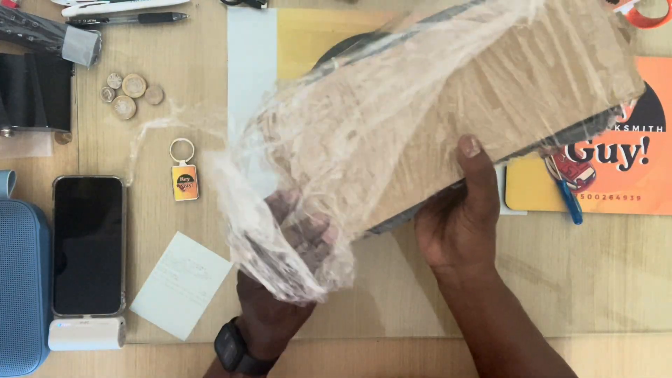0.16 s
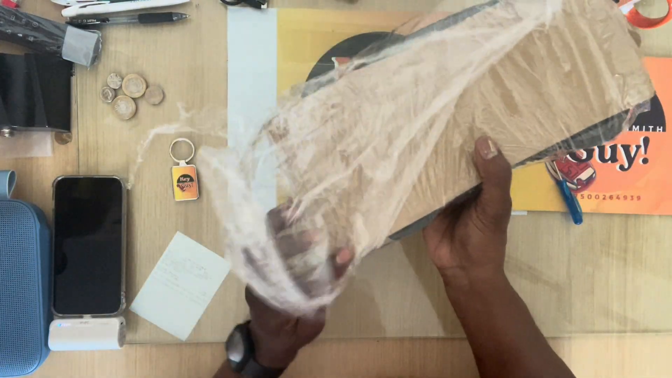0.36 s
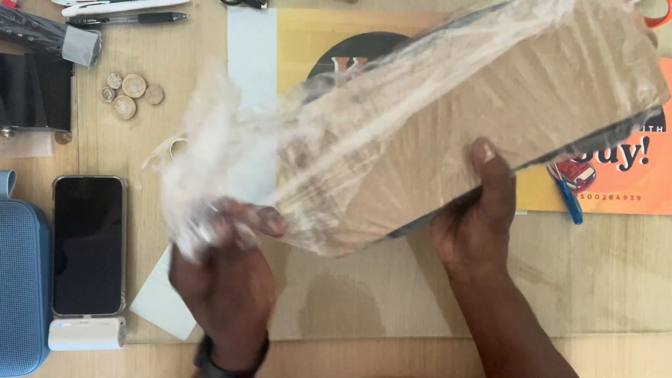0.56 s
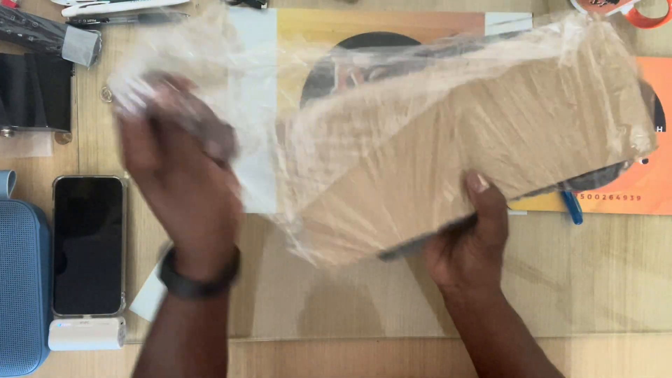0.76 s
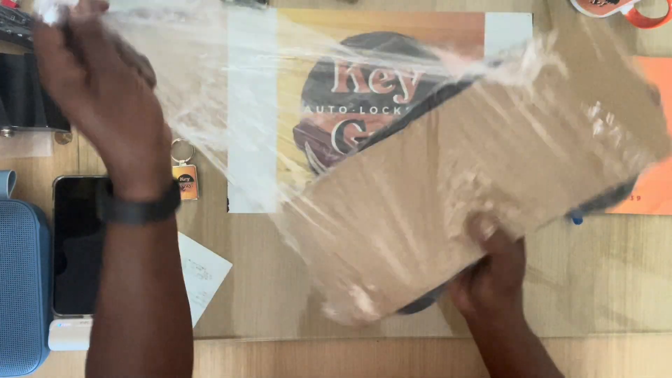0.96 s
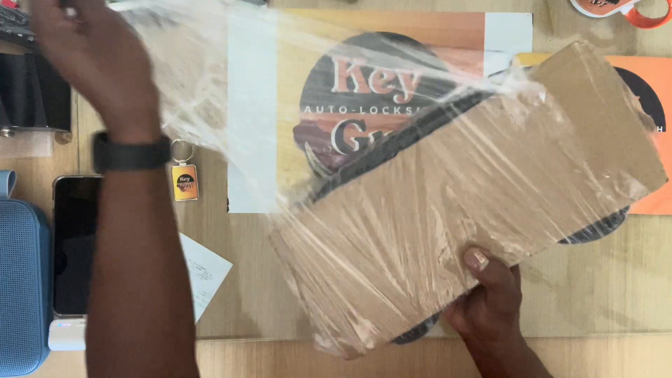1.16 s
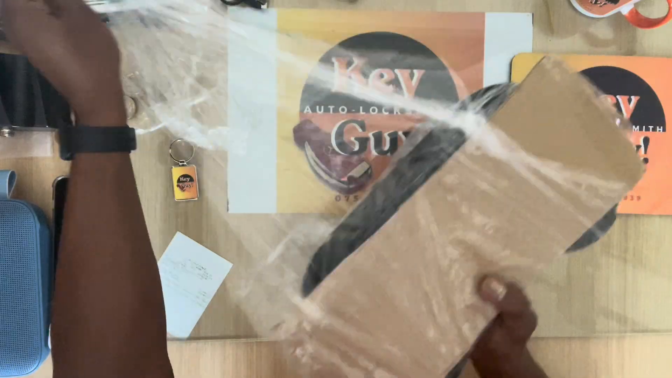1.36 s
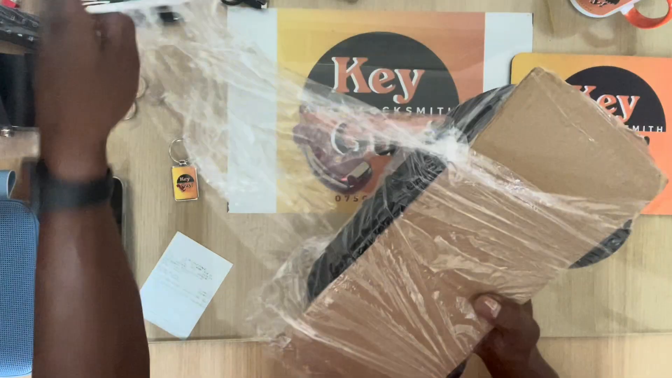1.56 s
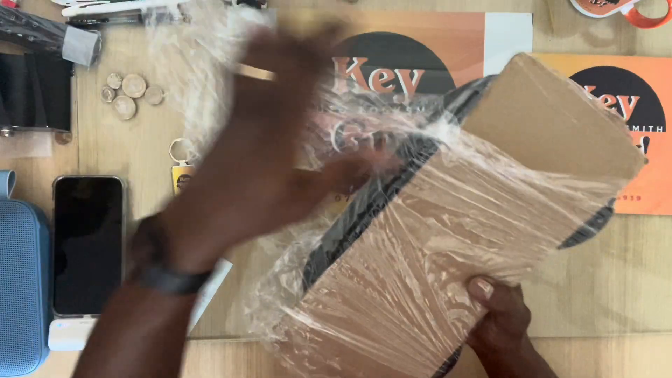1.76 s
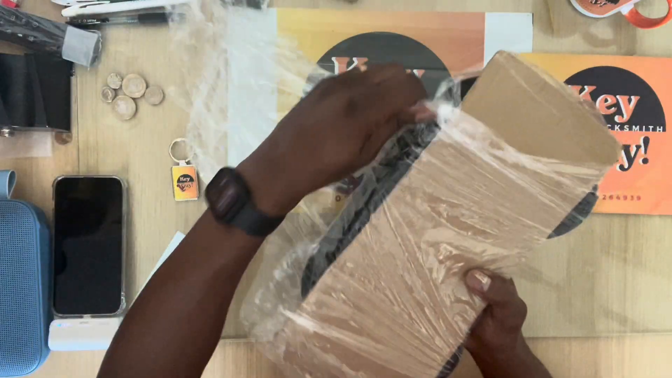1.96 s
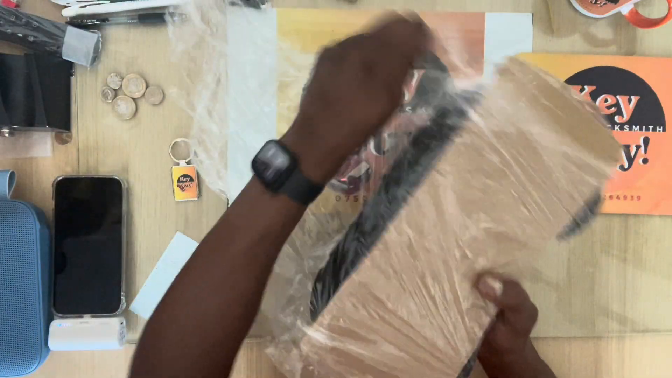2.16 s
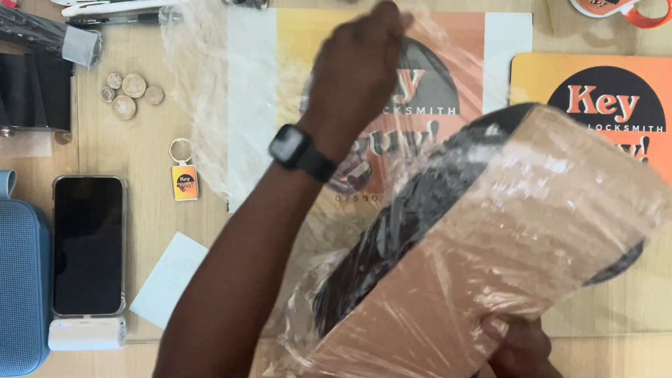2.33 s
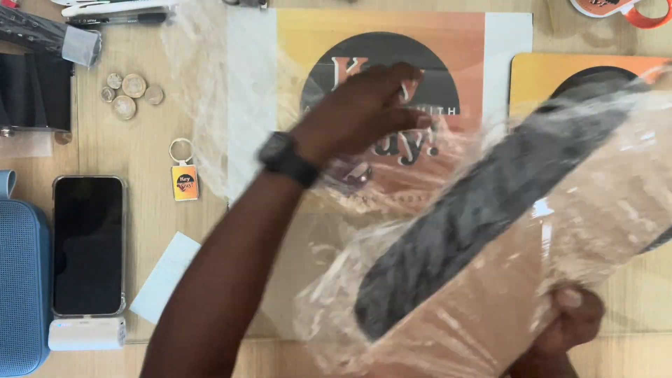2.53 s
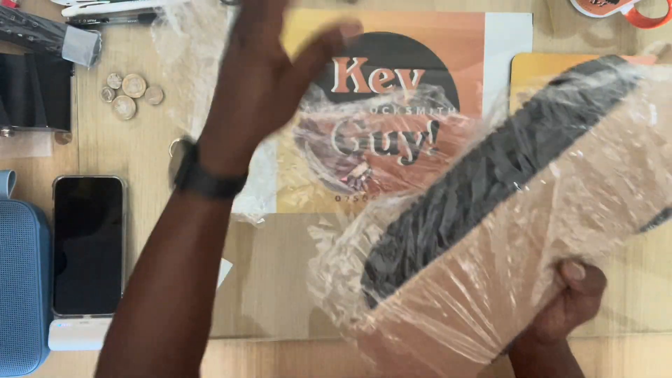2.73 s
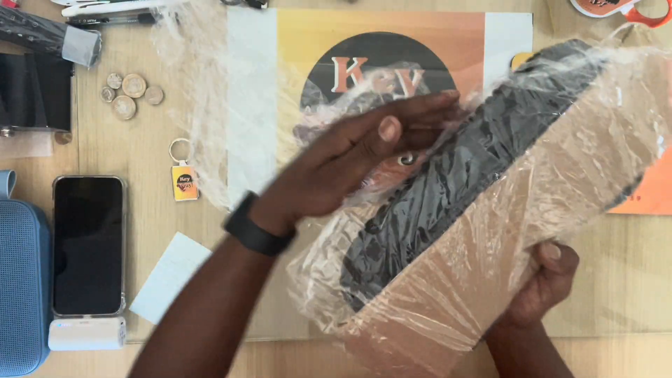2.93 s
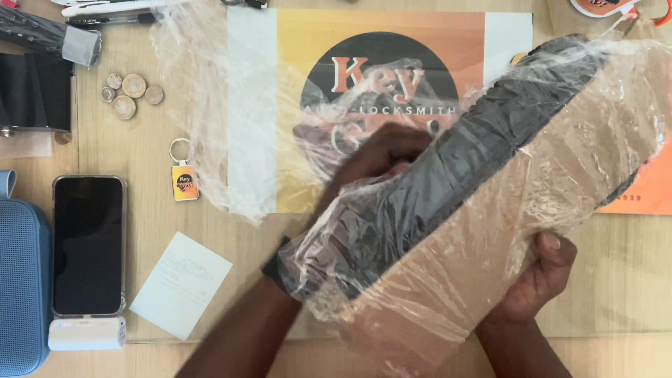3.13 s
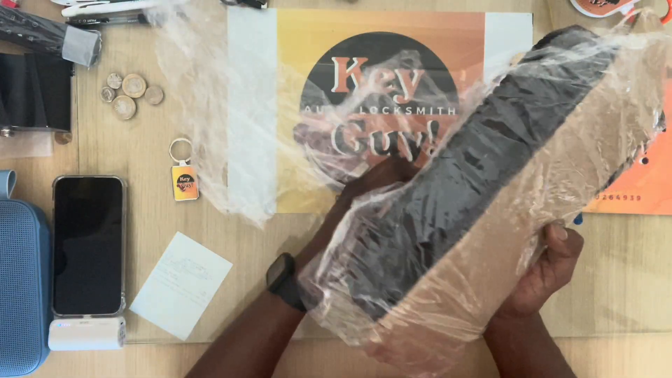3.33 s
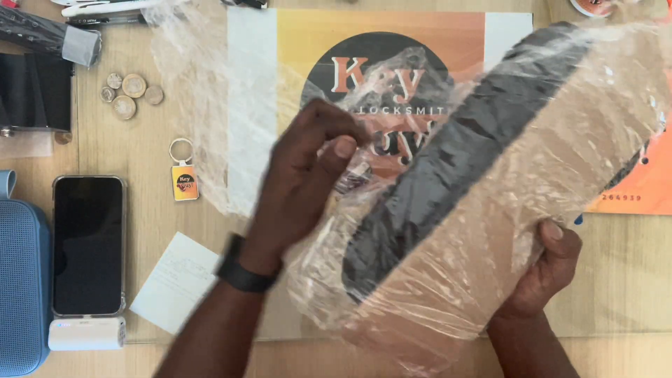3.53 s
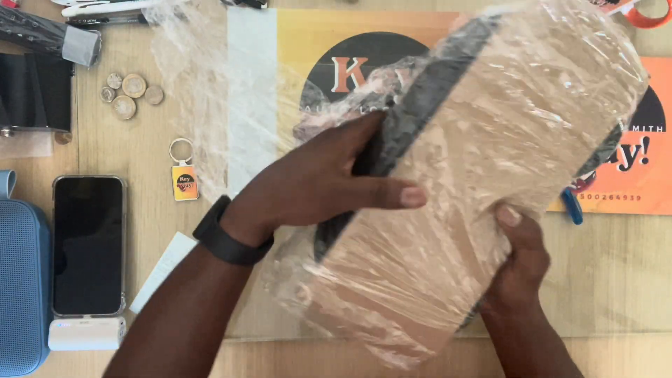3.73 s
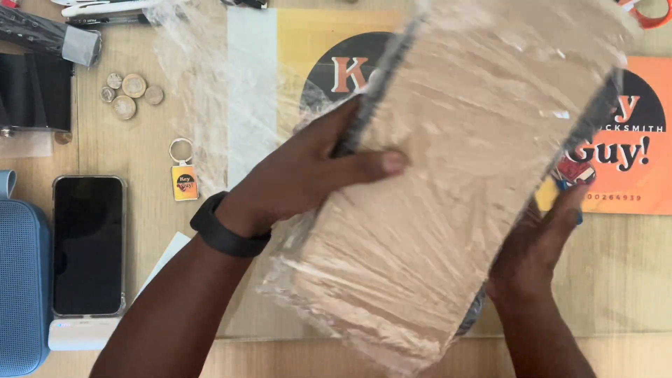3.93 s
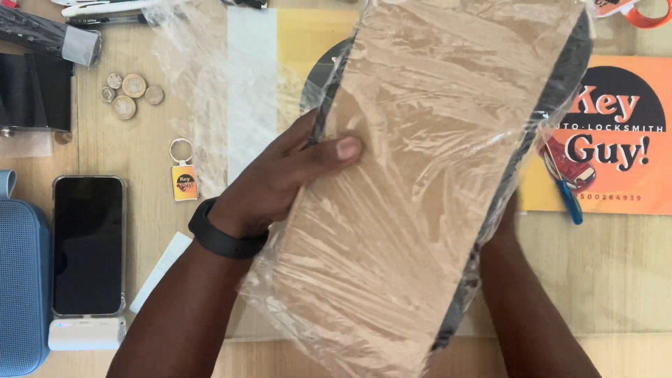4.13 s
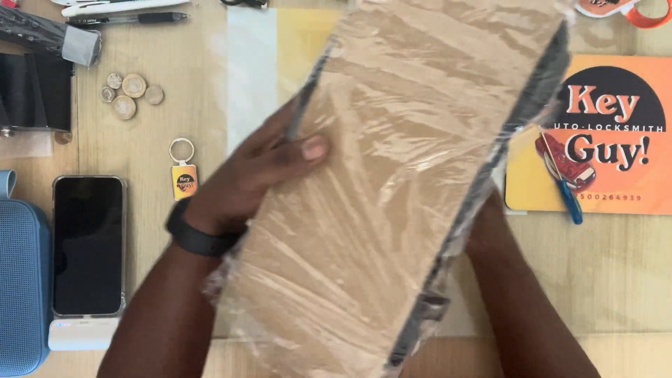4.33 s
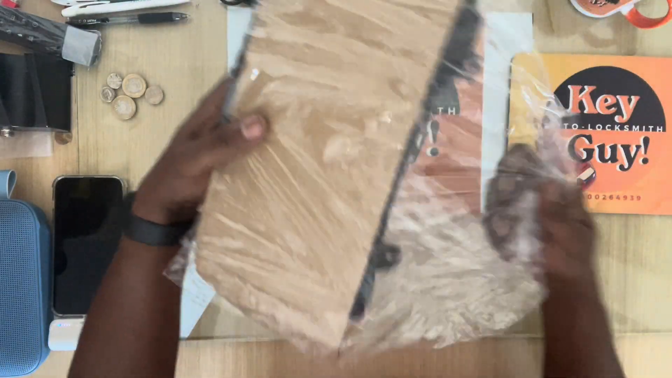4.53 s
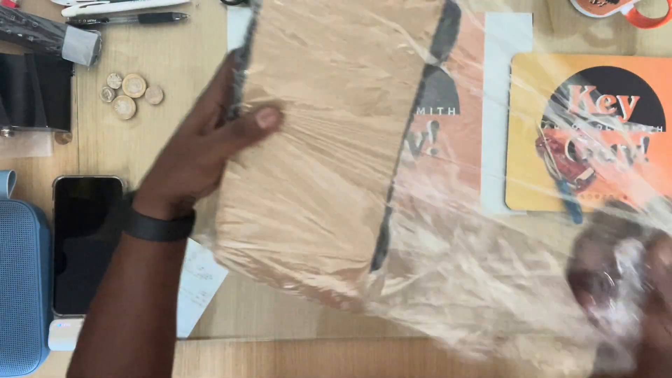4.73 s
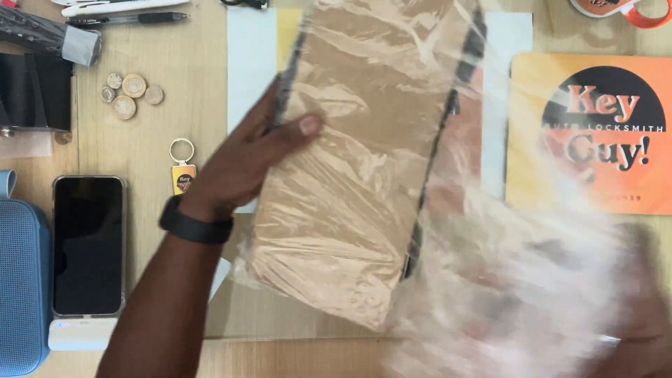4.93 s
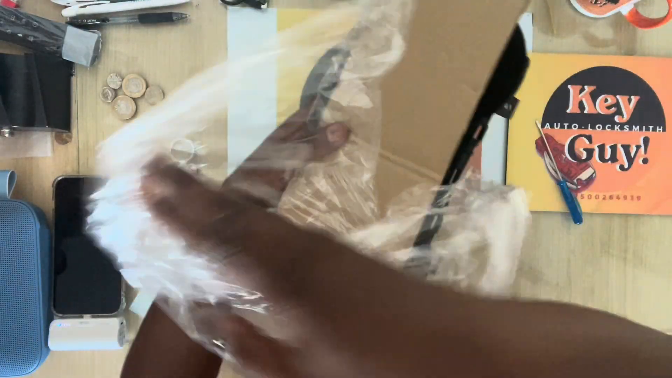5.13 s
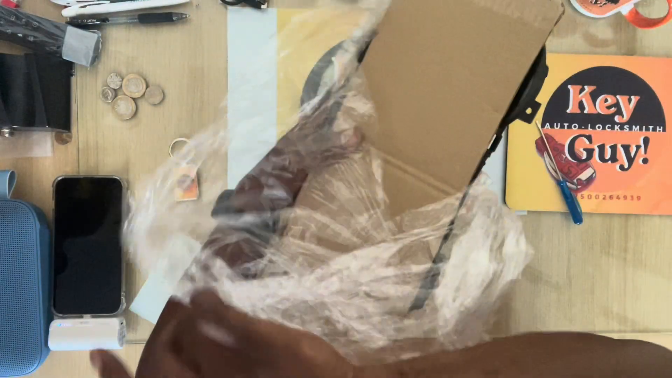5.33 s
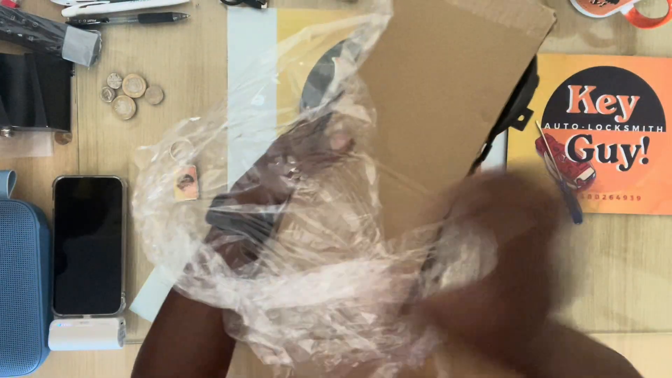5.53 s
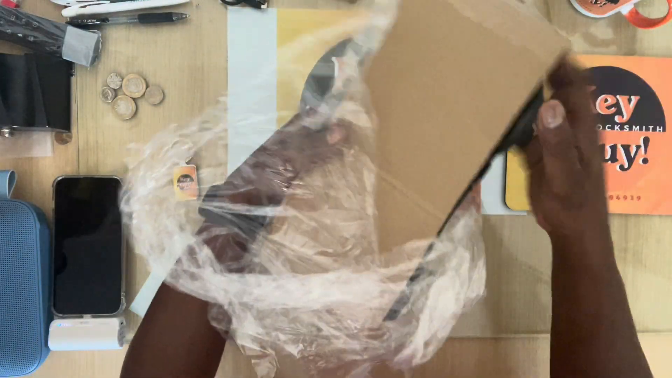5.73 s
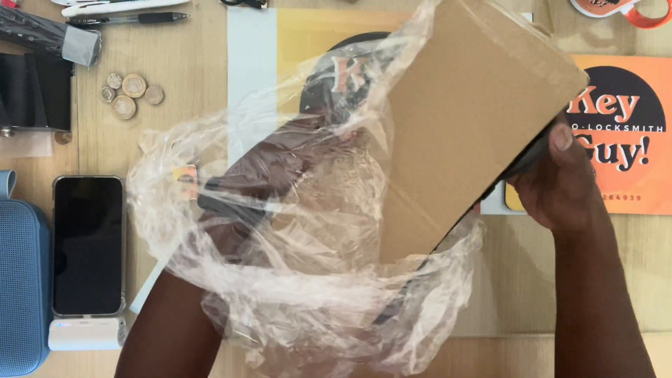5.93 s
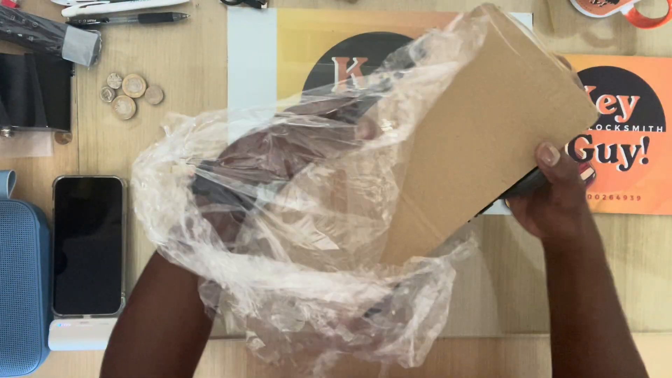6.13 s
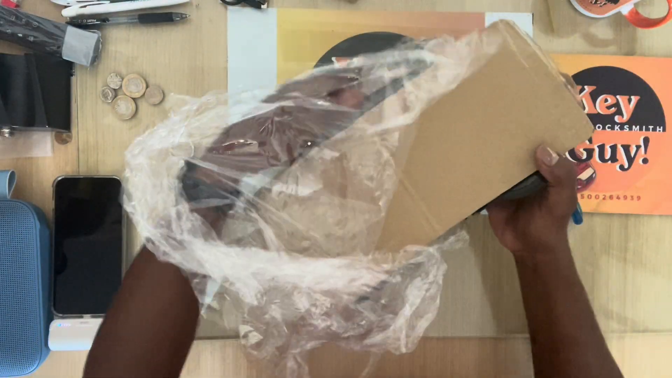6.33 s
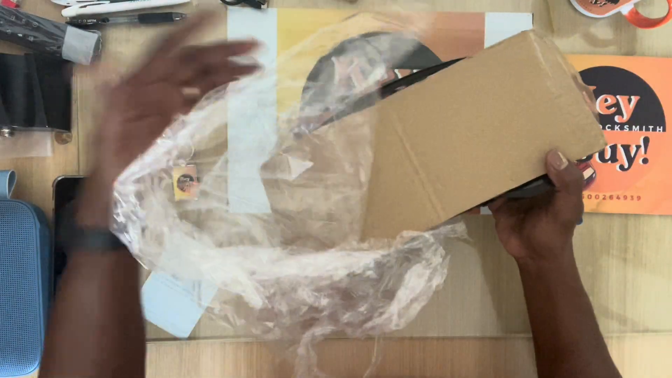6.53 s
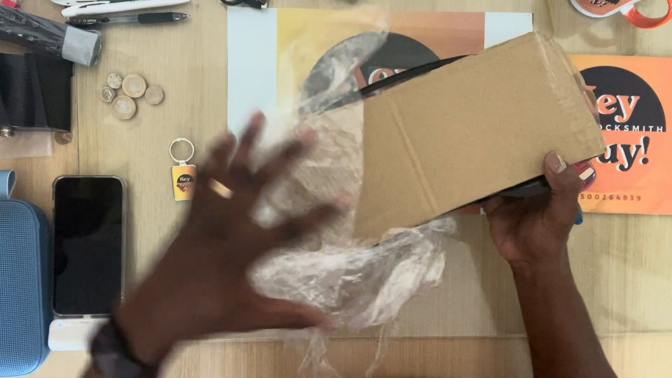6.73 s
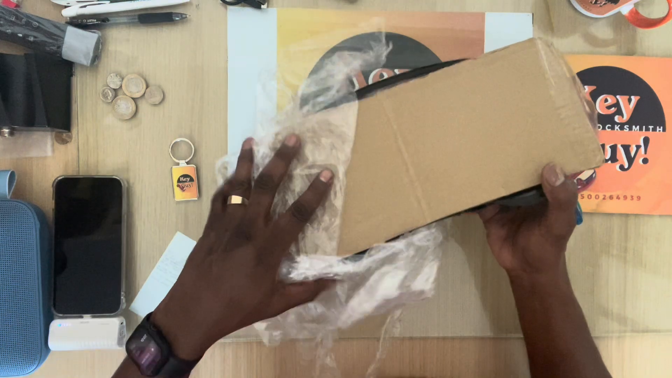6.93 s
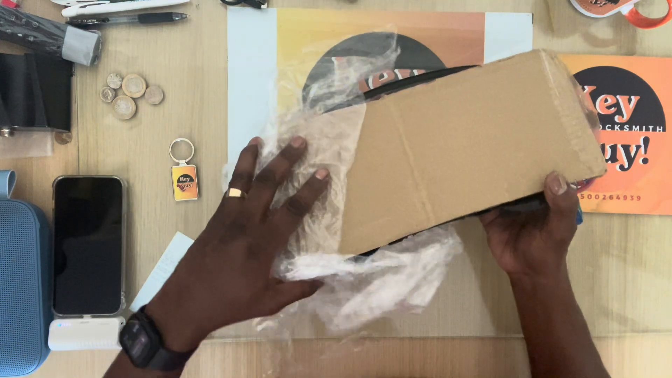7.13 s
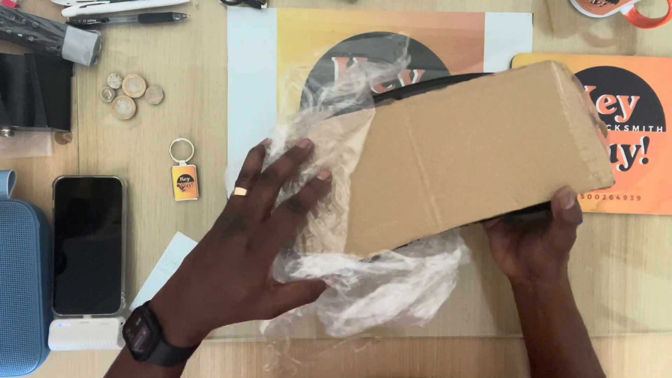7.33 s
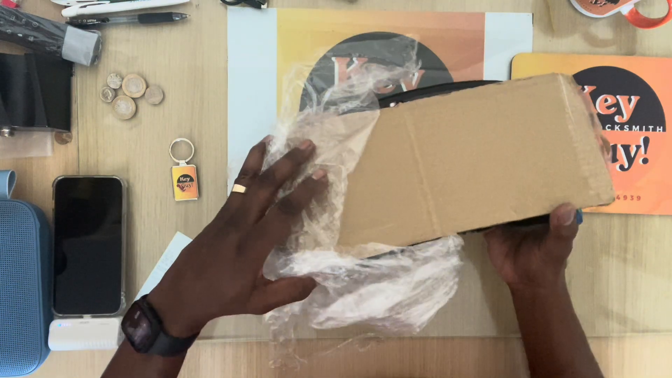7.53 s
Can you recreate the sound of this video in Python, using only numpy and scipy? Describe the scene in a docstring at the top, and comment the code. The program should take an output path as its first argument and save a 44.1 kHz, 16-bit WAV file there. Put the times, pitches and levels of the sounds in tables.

```python
"""Over a desk in a small dry room, close to a stereo microphone, hands pull cling film off a cardboard parcel.
The film peels and buckles in swarms of tiny clicks: four bouts of hard tugs, looser rustling between and after.
Folds snap in dying volleys of clicks, creases tick, and slipping film squeaks as a short wavering tone.
Stick-slip clicks and knocks of the hands ring the hollow box's modes. Faint coloured noise is the room air."""
import sys
import numpy as np
from scipy import signal
from scipy.fft import rfft, irfft
from scipy.io import wavfile
from scipy.ndimage import uniform_filter1d

SR = 44100
rng = np.random.default_rng(int(sys.argv[2]) if len(sys.argv) > 2 else 0)


def master_out(mix):
    """Clip the mix to full scale and print it as 16-bit PCM to the path in sys.argv[1]."""
    frames = np.transpose(np.atleast_2d(mix))
    ceiling = np.clip(frames, -1, 1)
    pcm = np.round(ceiling * 32767).astype(np.int16)
    wavfile.write(sys.argv[1], SR, pcm)


N = 334261
TAPS = 16384  # length of every response
TIME_S = np.arange(N) / SR
AGE_S = TIME_S[:TAPS]
FREQ_HZ = np.fft.rfftfreq(TAPS, 1 / SR)


def undb(db):
    """Decibels to gain."""
    return 10 ** (np.asarray(db) / 20)


def unit(x):
    """Scale a response to energy 1."""
    return x / np.sqrt(np.sum(x ** 2, axis=-1, keepdims=True))


def through(x, response):
    """Convolve a sound with a response, channel by channel."""
    return signal.oaconvolve(np.atleast_2d(x), np.atleast_2d(response), axes=-1)[:, :np.shape(x)[-1]]


def together_db(*gains):
    """Level in dB of unrelated sounds heard at once: powers add."""
    return 10 * np.log10(sum(gain ** 2 for gain in gains))


def colour(points, ripple_db=0):
    """Minimum-phase response of a spectrum, with random humps every 900 Hz."""
    hz, db = np.transpose(points)
    humps = np.interp(FREQ_HZ, np.arange(32) * 900, rng.standard_normal(32))
    spectrum_db = np.interp(np.log(FREQ_HZ + 1), np.log(hz), db) + ripple_db * humps
    cepstrum = irfft(np.log(undb(spectrum_db)))
    causal = 2 * cepstrum * (np.arange(TAPS) < TAPS // 2)
    return unit(irfft(np.exp(rfft(causal))))


def tail(t60_s, channels=2):
    """Dying noise of energy 1."""
    return unit(rng.standard_normal((channels, TAPS)) * undb(-60 * AGE_S / t60_s))


def clicks(rate_hz, spread_db):
    """Random clicks of mean power 1, of either sign; sizes spread exponentially in dB."""
    chance = rng.random(N)
    size = undb(spread_db * np.minimum(rng.exponential(size=N), 4)) * rng.choice([-1, 1], N)
    share = np.clip(rate_hz / SR, 1 / SR, 1)
    return (chance < share) * size / np.sqrt(share * np.mean(size ** 2))


# stereo image by frequency: (frequency [Hz], right leads left [rad], spread between places [rad],
# unlike part re shared [dB])
STEREO_IMAGE = [(10, 0, 0, -16), (350, .05, .1, -12), (1500, .35, .6, -8), (3000, .9, 1.3, -5),
                (5000, 2.0, 1.5, -5), (7300, 2.8, .2, -9), (9300, 1.6, .1, -10), (11000, .5, 0, -13),
                (12600, 0, 0, -22), (14000, -.9, 0, -10), (16000, -2.1, 0, -9)]


def path(place, near_db, room_db, near_t60_s=0.048, room_t60_s=0.25):
    """From a place (-1 to 1) to both channels: direct sound, scatter off parcel and desk, then the room."""
    hz, lead_rad, spread_rad, unlike_db = np.transpose(STEREO_IMAGE)
    shared, unlike = undb(near_db) * tail(near_t60_s) + undb(room_db) * tail(room_t60_s)
    shared[0] += 1  # direct sound
    side = rfft(unit(unlike)) * undb(np.interp(FREQ_HZ, hz, unlike_db))
    sign = np.array([[-1], [1]])  # left, right
    turn = np.exp(.5j * sign * np.interp(FREQ_HZ, hz, lead_rad + place * spread_rad))
    pair = irfft((rfft(unit(shared)) + sign * side) * turn)
    pair = np.roll(pair, 32, axis=1)  # room for phase leads
    fade = np.minimum(1, 2 - 2 * AGE_S / AGE_S[-1])  # over the second half
    return unit(pair * fade)


# cardboard modes, before detuning: (frequency [Hz], relative level [dB], t60 [s])
BOX_MODES = [(64, -9.5, 0.076), (100, -15.5, 0.095), (139, -36, 0.18), (221, -5.5, 0.12), (294, -10, 0.15),
             (337.4, 3, 0.082), (419, -8, 0.12), (505, -0.5, 0.076), (615, -3, 0.12), (816, -5, 0.13),
             (920, -9, 0.07), (1106, 11.5, 0.021), (1226, 1, 0.089), (1440, 2.5, 0.033), (1925, -13, 0.19),
             (2242, 4.5, 0.1), (2427, 4, 0.11), (3133, 4.5, 0.069)]


def box_ring(detune_fraction=0.005):
    """The cardboard's modes as decaying cosines; the grip shifts them a little."""
    hz, db, t60_s = np.transpose(BOX_MODES)[:, :, None]
    hz = hz * (1 + detune_fraction * rng.standard_normal(hz.shape))
    return unit(np.sum(undb(db - 60 * AGE_S / t60_s) * np.cos(2 * np.pi * hz * AGE_S), axis=0))


def moves(start_s, hold_s, start_db, sag_db, rise_db_per_s, fall_db_per_s):
    """Gain of a set of hand movements: each swells up to its start, sags over its hold, and dies away."""
    power = np.zeros(N)
    for at, length, db, sag in np.broadcast(start_s, hold_s, start_db, sag_db):
        age = TIME_S - at
        drop_db = rise_db_per_s * np.maximum(-age, 0)
        drop_db += sag * np.clip(age / length, 0, 1)
        drop_db += fall_db_per_s * np.maximum(age - length, 0)
        heard = drop_db < 80
        power[heard] += undb(db - drop_db[heard]) ** 2
    return np.sqrt(power)


# All levels here drive the sources, before the mix gains.
# hard tugs on the taut film: (hold start [s], hold [s], crackle [dB], broad folds [dB],
# drag on the box [dB], sag over the hold [dB])
TUGS = [(0.398, 0.16, -23.5, -26, -29.5, 4), (0.721, 0.089, -26, -34, -30.5, -1),
        (0.819, 0.031, -24.5, -27.5, -30.5, -2), (0.913, 0.034, -29, -33, -34, -0.5),
        (1.09, 0.1, -27, -32, -30, -1), (1.159, 0.051, -23.5, -24.5, -29.5, 2.5),
        (1.239, 0.025, -24, -29, -22, 4), (1.869, 0.029, -26.5, -27, -33, 3.5),
        (1.959, 0.14, -31.5, -38.5, -37, -1), (2.12, 0.058, -27, -27, -28, -1.5),
        (2.202, 0.015, -32.5, -23.5, -24.5, 4.5)]
# the hand gathers or brushes the loose film: (hold start [s], hold [s], crackle [dB], broad folds [dB])
STROKES = [(0.082, 0.07, -42.5, -41.5), (0.312, 0.09, -39, -47), (1.414, 0.027, -43, -67),
           (2.4, 0.085, -42, -44), (2.943, 0.015, -45, -53), (3.08, 0.043, -43, -48),
           (3.189, 0.0084, -45.5, -42.5), (3.278, 0.013, -44.5, -44), (3.657, 0.013, -51, -44),
           (4.164, 0.01, -51, -42.5), (4.175, 0.13, -42.5, -43), (4.407, 0.012, -36.5, -38.5),
           (4.48, 0.034, -42, -42.5), (4.64, 0.045, -39.5, -47.5), (4.885, 0.014, -39.5, -43.5),
           (5.047, 0.018, -60, -59), (6.618, 0.054, -48.5, -56.5), (6.829, 0.033, -41.5, -41),
           (7.105, 0.023, -49, -55), (7.329, 0.02, -54, -46.5), (7.526, 0.04, -52.5, -39)]
# stirring of the slack film all along: (time [s], crackle [dB], broad folds [dB])
SLACK = [(0, -53.5, -54.5), (0.25, -46, -47), (0.65, -38.5, -47.5), (1.32, -41, -44), (1.58, -62.5, -63),
         (1.8, -61.5, -71), (1.95, -59.5, -59), (2.56, -47, -48), (2.685, -60.5, -57), (2.87, -53, -53),
         (3.03, -50, -46), (3.34, -56, -46), (3.44, -58, -58.5), (3.59, -66, -75), (3.77, -53, -45),
         (4.0, -52, -54), (4.11, -64, -57), (4.33, -48, -54.5), (5.05, -44, -46.5), (5.52, -61, -64),
         (6.25, -53, -48.5), (6.53, -53.5, -56.5), (6.78, -47.5, -49), (7.58, -58.5, -48.5)]
TUG_RISE_DB_PER_S, TUG_FALL_DB_PER_S = 735, 237
STROKE_RISE_DB_PER_S, STROKE_FALL_DB_PER_S = 404, 156
# loose film drags a little on the box, over the steady shifting of the grip
DRAG_DB, DRAG_FOLDS_SHARE, GRIP_DB = -2.5, 0.72, -56


def handling():
    """Levels in dB of crackle, folds and drag: tugs on taut film, strokes and stirring of loose film."""
    tug_s, tug_hold_s, *tug_levels, sag_db = np.transpose(TUGS)
    stroke_s, stroke_hold_s, *stroke_levels = np.transpose(STROKES)
    slack_s, *slack_levels = np.transpose(SLACK)
    taut = [moves(tug_s, tug_hold_s, db, sag_db, TUG_RISE_DB_PER_S, TUG_FALL_DB_PER_S)
            for db in tug_levels]
    loose = []
    for stroke_db, slack_db in zip(stroke_levels, slack_levels):
        strokes = moves(stroke_s, stroke_hold_s, stroke_db, 0, STROKE_RISE_DB_PER_S, STROKE_FALL_DB_PER_S)
        stirring = undb(np.interp(TIME_S, slack_s, slack_db))
        loose.append(together_db(strokes, stirring))
    crackle_db, folds_db = loose
    loose_drag_db = DRAG_DB + crackle_db + DRAG_FOLDS_SHARE * (folds_db - crackle_db)
    loose.append(together_db(undb(loose_drag_db), undb(GRIP_DB)))
    return [together_db(tug, undb(loose_db)) for tug, loose_db in zip(taut, loose)]


def jerks(rate_hz, t60_s, strength, spread_db):
    """Level in dB, mean power 1, of film that lets go suddenly at random and settles each time."""
    sizes = undb(spread_db * np.minimum(rng.exponential(size=N), 3)) ** 2
    slips = through((rng.random(N) < rate_hz / SR) * sizes, undb(-60 * AGE_S / t60_s) ** 2)[0]
    power = 1 + strength * np.abs(slips) / np.mean(slips)
    return 10 * np.log10(power / power.mean())


def film(db, spectrum, rate_hz, spread_db, ripple_db, near_db, box_db, crowding=.55, count=4, room_db=-9):
    """Patches of film buckle, each with its own colour and place; a harder pull brings more clicks."""
    busy_hz = rate_hz * undb(crowding * (db + 40.5))  # rate_hz holds at -40.5 dB
    out = 0
    for place in np.linspace(-1, 1, count):
        patch = colour(spectrum, ripple_db)
        answer = unit(through(box_ring(), patch))  # the box answers the film stuck to it
        patch = unit(patch + undb(box_db) * answer)
        response = through(path(place, near_db, room_db), patch)
        out = out + through(clicks(busy_hz / count, spread_db), response)
    return out * undb(db) / np.sqrt(count)


# spectrum of the fine clicks: (frequency [Hz], relative density [dB])
CRACKLE = [(500, -21), (1500, -5), (2800, -1), (5000, 0), (8000, 1.5), (11000, 0.5), (14000, -1),
           (16000, -5.5)]


def crackle(db):
    """Small, bright buckles of the film in dense swarms."""
    return film(db, CRACKLE, rate_hz=2600, spread_db=-2.0, ripple_db=5.5, near_db=2.0, box_db=-33, count=6)


# spectrum of the dull broad folds: (frequency [Hz], relative density [dB])
FOLDS = [(200, -19), (600, -1.5), (1000, 2.5), (1300, -0.5), (2200, -2.5), (3500, -5), (8000, -23.5)]


def broad_folds(db):
    """Broad folds buckle less often and duller, and rouse the box more."""
    return film(db, FOLDS, rate_hz=500, spread_db=0.5, ripple_db=0.5, near_db=-0.5, box_db=-3.5, count=3)


# spectrum of the single creases: (frequency [Hz], relative density [dB])
CREASES = [(500, -22), (1500, -6.5), (4000, 3), (7000, -1.5), (11000, 5.5), (16000, -1)]


def creases(db):
    """Single creases flick over with a bright, sparse tick."""
    return film(db, CREASES, rate_hz=70, spread_db=2.5, ripple_db=2.5, near_db=-4, box_db=-17,
                crowding=.3, count=3)


# folds that let go: (time [s], level [dB], dull broad folds re crackle [dB])
SNAPS = [(0.0333, -31, -18), (0.0526, -29, -3), (0.392, -35, -9), (0.716, -4.5, -13), (0.7237, -9.5, 2),
         (0.9995, -42, -16), (1.0251, -19, -23), (1.0671, -19, -9), (1.083, -9, -18), (1.0954, -8, -18),
         (1.1306, -12, -1.5), (1.2336, -4, 3), (1.56, -39, -12), (1.595, -37, -1), (1.6856, -32.5, -26),
         (1.8548, -29, -7), (1.8781, -13, -19), (1.9725, -13, -28), (2.1308, -4.5, -8), (2.189, -4, 0),
         (2.3311, -32, 0), (2.376, -26.5, 3), (3.0729, -24.5, 2), (3.1087, -19.5, -4), (3.128, -16.5, 0.5),
         (3.3431, -28, 1), (3.415, -43, -10), (3.649, -28, -7), (3.676, -22, 1), (4.1657, -18, -29),
         (4.6873, -20, -9), (5.044, -15, -21), (5.2083, -16, 3), (5.7475, -31, 15), (5.89, -34.5, 6),
         (7.2332, -30, 3), (7.5482, -28, -4)]


def snaps(first_db=9, volley_t60_s=0.05):
    """A fold gives way with one sharp click, and its neighbours follow in a dying volley."""
    out = np.zeros((2, N + TAPS))
    for s, db, folds_db in SNAPS:
        volley = rng.laplace(size=TAPS) * undb(-60 * AGE_S / volley_t60_s)
        volley[0] = undb(first_db)
        place = rng.uniform(-1, 1)
        patch = colour(CRACKLE, ripple_db=2) + undb(folds_db) * colour(FOLDS, ripple_db=2.5)
        snap = through(volley, through(path(place, near_db=-5.0, room_db=-8), patch))
        out[:, int(s * SR):][:, :TAPS] += undb(db) * snap / np.abs(snap).max()
    return out[:, :N]


# spectrum of the drag: (frequency [Hz], relative density [dB])
DRAG = [(25, -17), (55, -5.5), (100, -2), (170, -0.5), (320, 2.5), (550, -3), (900, -9), (2000, -20)]


def drag(db, count=3):
    """Film and fingers stick and slip on the box, which booms and rings."""
    out = 0
    for place in np.linspace(-1, 1, count):
        wall = colour(DRAG)
        body = unit(wall + undb(-3) * unit(through(box_ring(), wall)))
        response = through(path(place, near_db=16.5, room_db=-23), body)
        out = out + through(clicks(rate_hz=350, spread_db=2.5), response)
    return out * undb(db) / np.sqrt(count)


# blows on the box, fingertip first, then the flesh of the hand: (time [s], tap level [dB],
# tap pitch [Hz], thump level [dB], thump pitch [Hz], wall boom level [dB])
KNOCKS = [(0.13, -35, 1190, -26.5, 262, -36), (0.392, -12.5, 1190, -38, 307, -37),
          (0.797, -22, 900, -21, 370, -29), (0.953, -38, 1200, -37, 300, -27.5),
          (1.236, -15.5, 1070, -7, 470, -15.5), (1.344, -35, 1200, -24, 590, -34),
          (1.689, -34.5, 1000, -36.5, 390, -52), (1.825, -42, 1200, -25, 260, -46),
          (2.078, -36, 1200, -22, 315, -42), (2.139, -36, 900, -17.5, 294, -43),
          (2.187, -34, 800, -11, 484, -31), (2.25, -21, 915, -30, 600, -31),
          (2.332, -30, 1500, -41, 400, -50), (3.127, -28, 935, -34, 184.3, -36),
          (3.679, -27.5, 1230, -34.5, 295, -38), (4.167, -30.5, 1200, -42, 300, -48),
          (4.495, -34, 1200, -30, 470, -43), (5.2094, -13.5, 1150, -14, 340, -28),
          (5.749, -38, 1550, -53, 400, -42), (6.063, -33, 1400, -30.5, 375, -50),
          (6.099, -33.5, 930, -41, 350, -52), (6.867, -26.5, 720, -37, 400, -51),
          (7.233, -31.5, 1390, -53, 400, -47), (7.551, -22.5, 1160, -37, 338, -48)]
THUMP_DELAY_S, BOOM_HZ = 0.00392, 131
TAP_LOSS_PER_CYCLE, THUMP_LOSS_PER_CYCLE = 1.0, 1.11  # nepers


def knocks(dead_db=-9, dead_t60_s=0.052):
    """A push as short as the contact rings the box, over the cardboard's dead thud: tap, thump and boom."""
    out = np.zeros((2, N + TAPS))
    for s, tap_db, tap_hz, thump_db, thump_hz, boom_db in KNOCKS:
        late_s = s + THUMP_DELAY_S
        parts = ((s, tap_db, tap_hz, TAP_LOSS_PER_CYCLE),
                 (late_s, thump_db, thump_hz, THUMP_LOSS_PER_CYCLE),
                 (late_s, boom_db, BOOM_HZ, THUMP_LOSS_PER_CYCLE))
        for at, db, hz, loss in parts:
            push = np.sin(2 * np.pi * hz * AGE_S) * np.exp(-loss * hz * AGE_S)
            body = through(push, box_ring() + undb(dead_db) * tail(dead_t60_s, channels=1))
            blow = through(body, path(0, near_db=-15.5, room_db=-22.5))
            out[:, int(at * SR):][:, :TAPS] += undb(db) * blow / np.abs(blow).max()
    return out[:, :N]


# film that slips under a finger: (time [s], length [s], mean pitch [Hz], level [dB], octave re tone [dB])
SQUEAKS = [(0.052, 0.0086, 540, -36.5, -17), (3.227, 0.02, 1774, -36, 4), (3.344, 0.04, 2030, -41.5, -13)]


def squeaks():
    """Fast, uneven stick and slip: a short, hoarse tone with its octave."""
    out = np.zeros(N + TAPS)
    for s, length_s, hz, db, octave_db in SQUEAKS:
        waver, grip = uniform_filter1d(rng.standard_normal((2, TAPS)), 49) * 7  # smoothed, variance 1
        phase = 2 * np.pi * np.cumsum(hz * (1 + .05 * waver)) / SR
        swell = np.sin(np.pi * np.sqrt(np.minimum(AGE_S / length_s, 1))) * undb(3 * grip)
        tone = np.sin(phase) + undb(octave_db) * np.sin(2 * phase)
        out[int(s * SR):][:TAPS] += undb(db) * swell * tone
    return through(out[:N], path(0, near_db=-7, room_db=-14))


# spectrum of the room air: (frequency [Hz], relative density [dB])
AIR = [(15, -73), (25, -1.5), (207, 4), (438, -8.5), (529, 7.5), (621, -2.5), (1420, -11), (6040, -34),
       (7280, -35), (10600, -48), (15000, -28)]


def room_air(gain_db=-57):
    """Quiet, mostly low noise of the room, partly alike in both channels."""
    noise = rng.standard_normal(N) + 1.32 * rng.standard_normal((2, N))  # shared + separate
    return undb(gain_db) * through(noise, colour(AIR))


def scene(left_db=-0.54):
    """One jerky pull drives film, folds and box together; sparse bright creases tick along with the crackle."""
    crackle_db, folds_db, drag_db = handling()
    jerk_db = jerks(rate_hz=220, t60_s=0.029, strength=0.9, spread_db=0.9)
    wrap = undb(4.0) * crackle(crackle_db + jerk_db)
    wrap = wrap + undb(-2.54) * broad_folds(folds_db + jerk_db)
    wrap = wrap + undb(-5.0) * creases(crackle_db)
    wrap = wrap + snaps() + squeaks()
    box = undb(-0.7) * drag(drag_db + jerk_db) + knocks()
    return (wrap + box + room_air()) * undb([[left_db], [-left_db]])


def record(dry, low_cut_hz=42, top_hz=15750):
    """The microphone sheds the deepest bass and the recorder cuts the top."""
    lean = signal.sosfilt(signal.butter(2, low_cut_hz, "high", fs=SR, output="sos"), dry)
    return signal.sosfilt(signal.ellip(10, .2, 80, top_hz, fs=SR, output="sos"), lean)


dry = scene()
out = record(dry)
master_out(out)
```